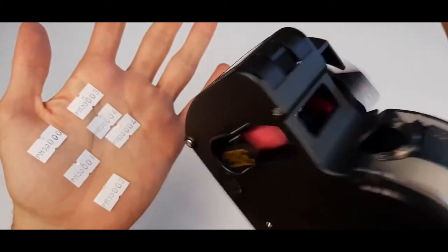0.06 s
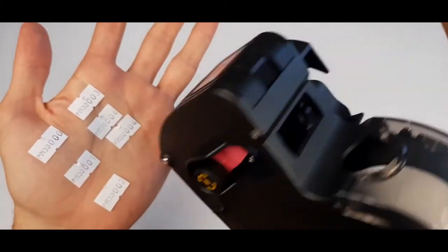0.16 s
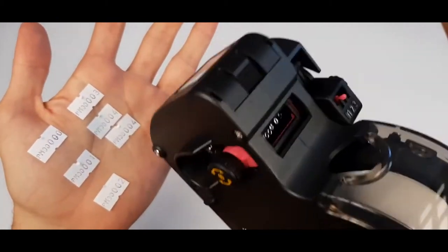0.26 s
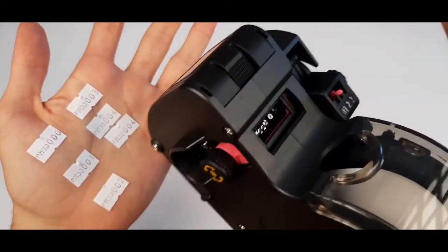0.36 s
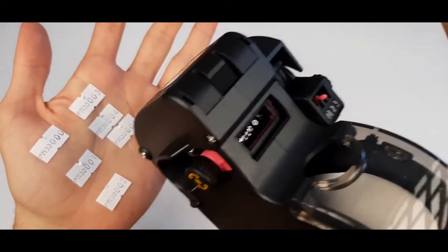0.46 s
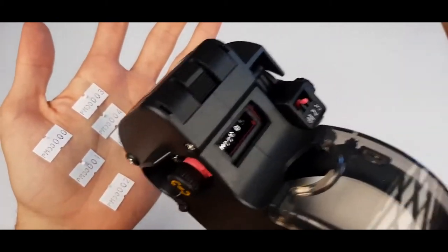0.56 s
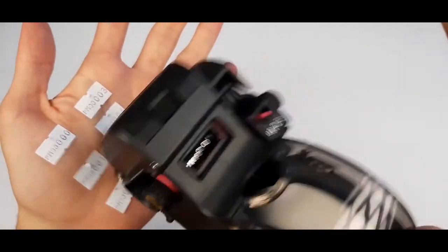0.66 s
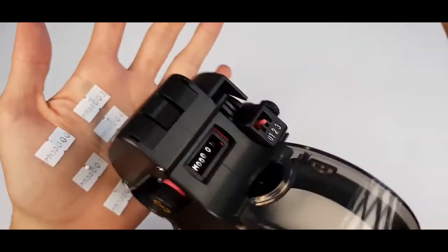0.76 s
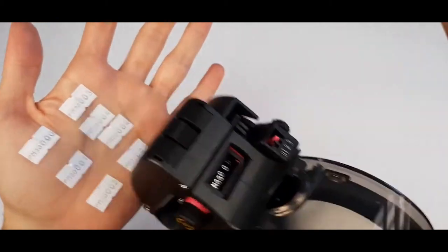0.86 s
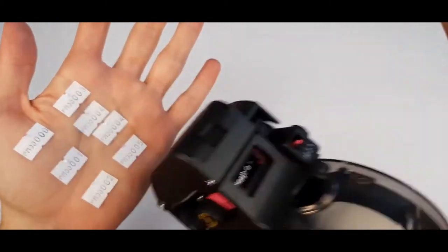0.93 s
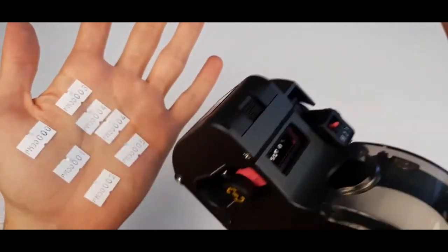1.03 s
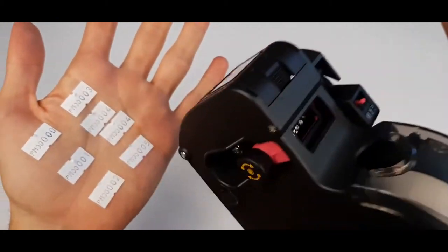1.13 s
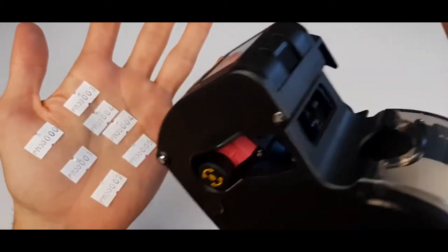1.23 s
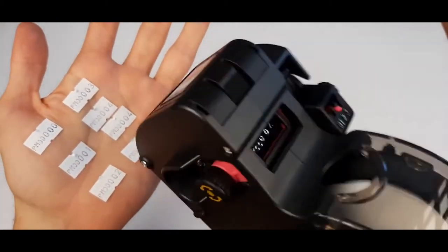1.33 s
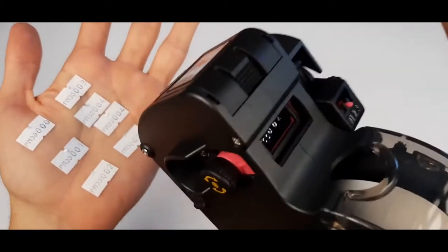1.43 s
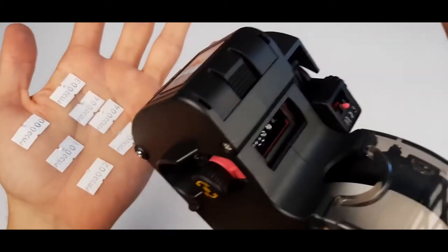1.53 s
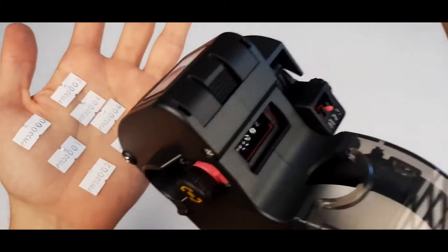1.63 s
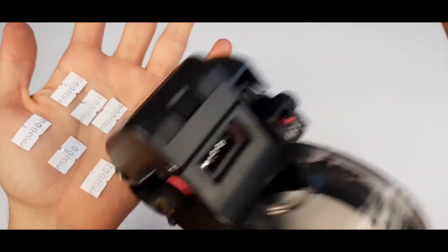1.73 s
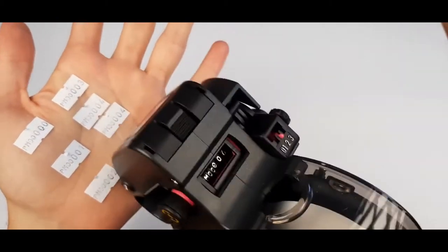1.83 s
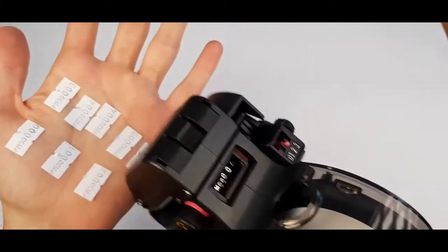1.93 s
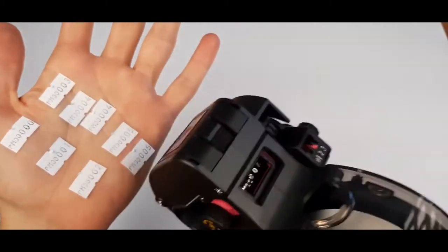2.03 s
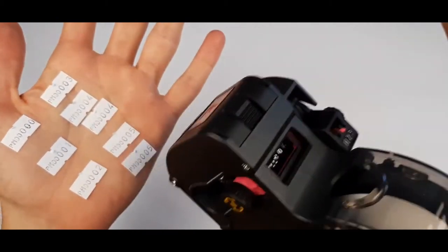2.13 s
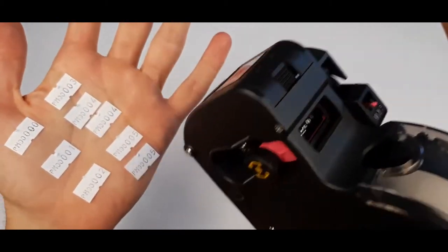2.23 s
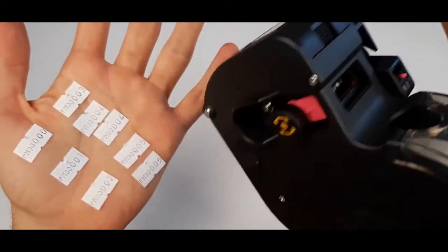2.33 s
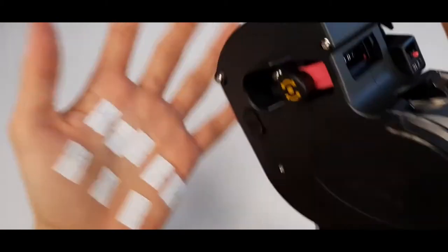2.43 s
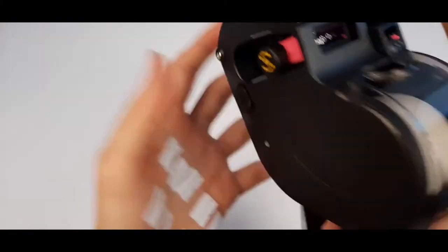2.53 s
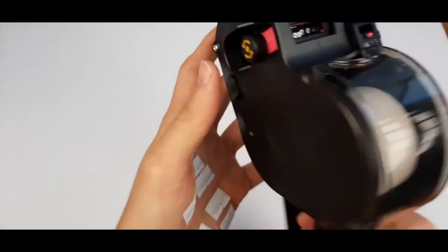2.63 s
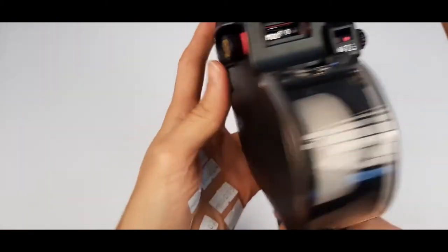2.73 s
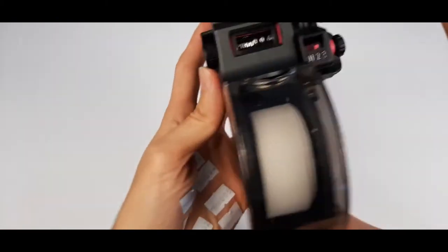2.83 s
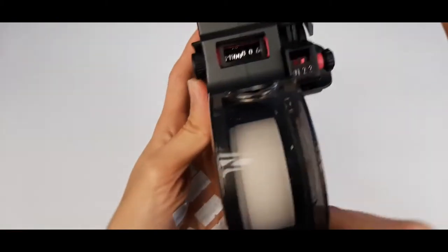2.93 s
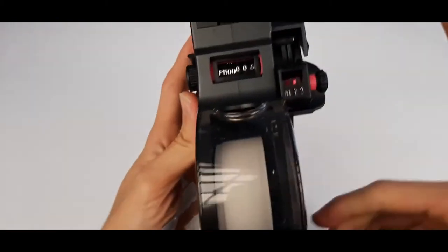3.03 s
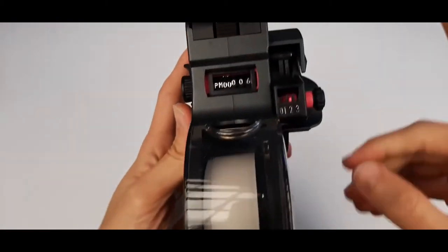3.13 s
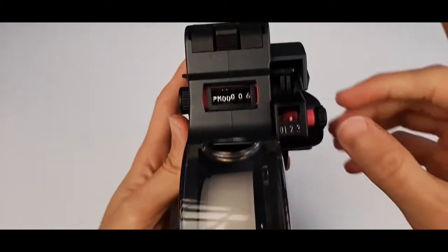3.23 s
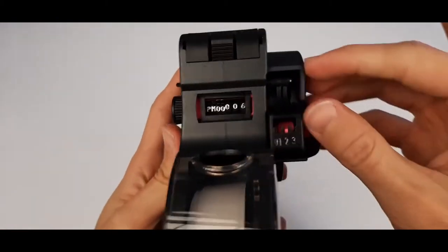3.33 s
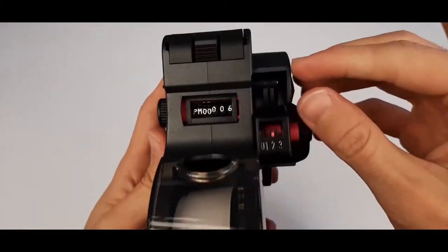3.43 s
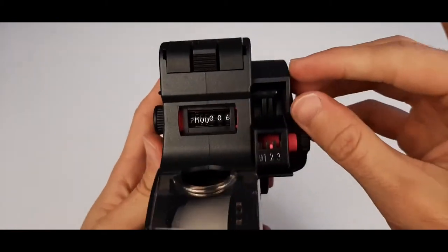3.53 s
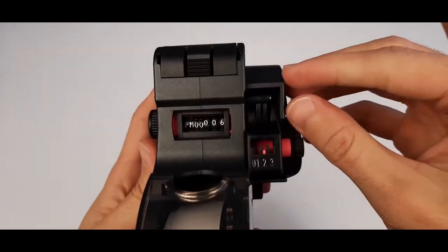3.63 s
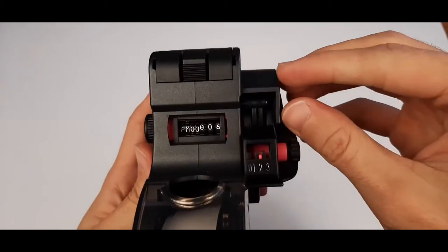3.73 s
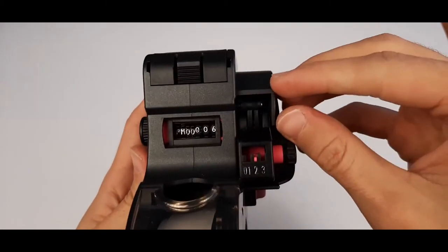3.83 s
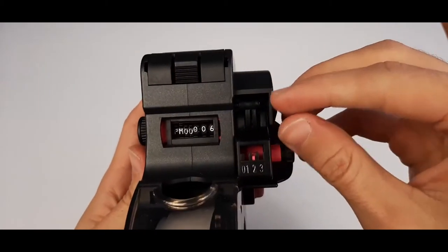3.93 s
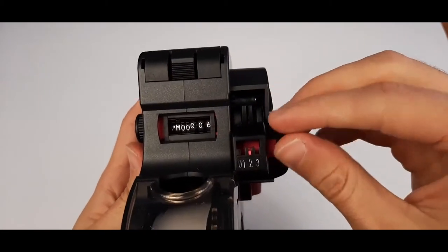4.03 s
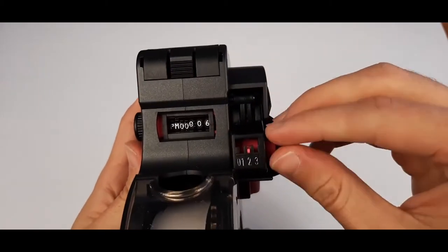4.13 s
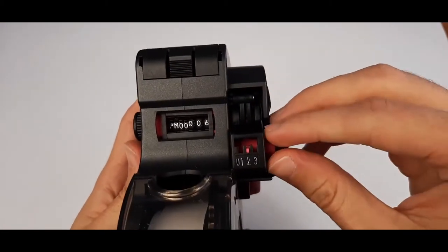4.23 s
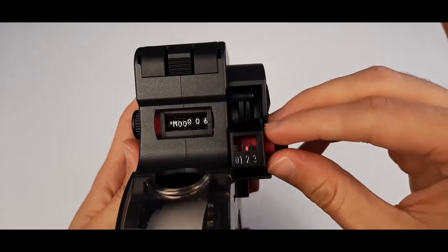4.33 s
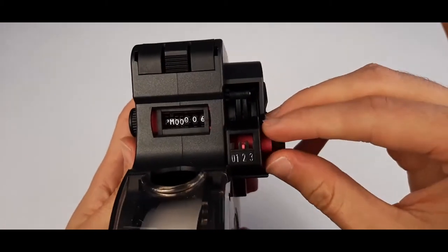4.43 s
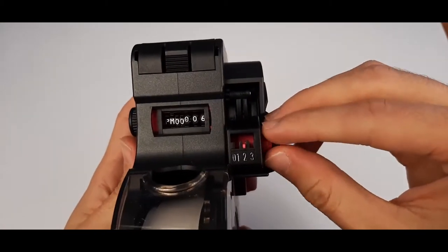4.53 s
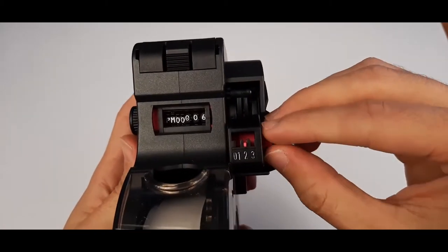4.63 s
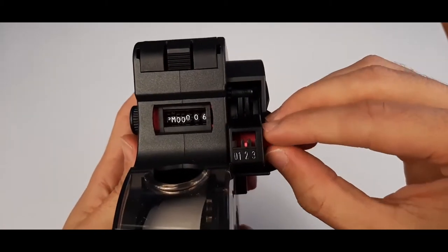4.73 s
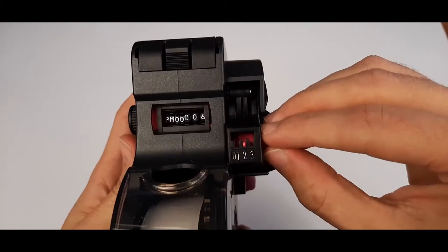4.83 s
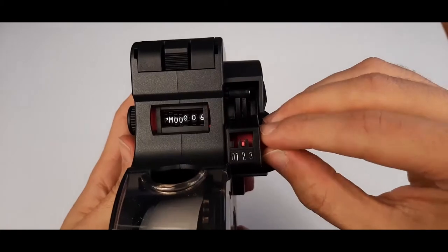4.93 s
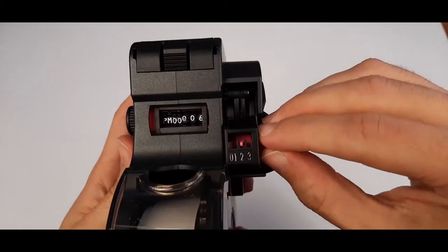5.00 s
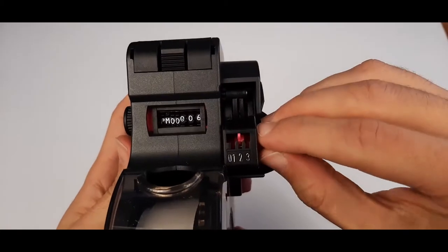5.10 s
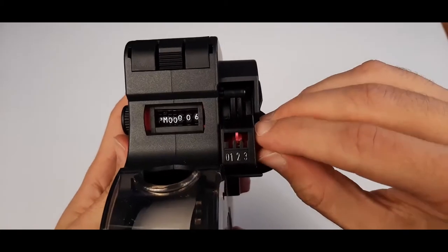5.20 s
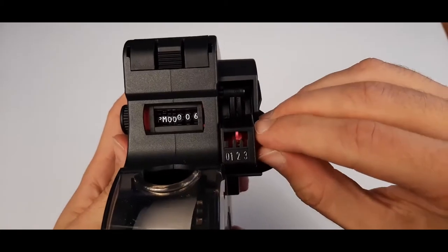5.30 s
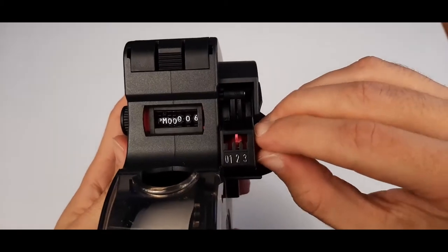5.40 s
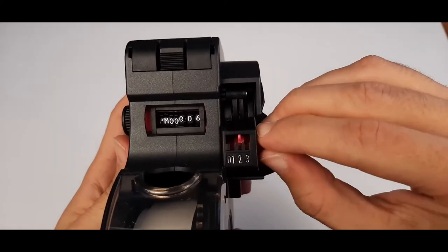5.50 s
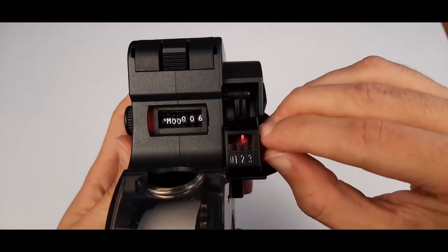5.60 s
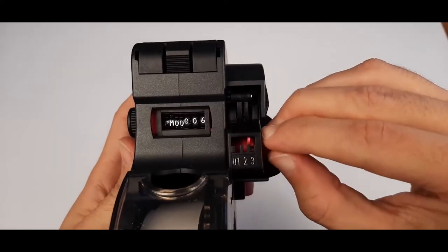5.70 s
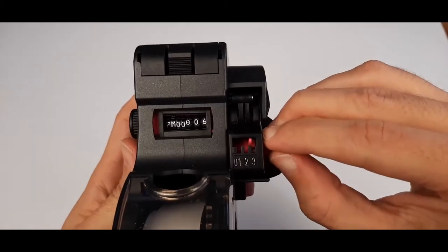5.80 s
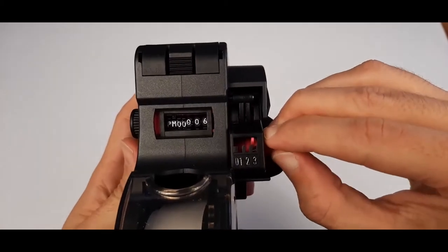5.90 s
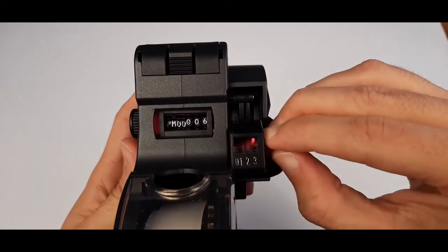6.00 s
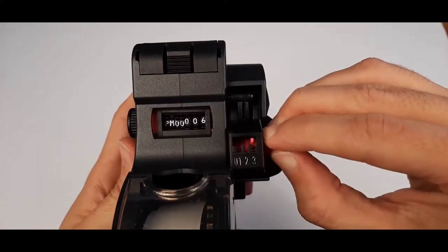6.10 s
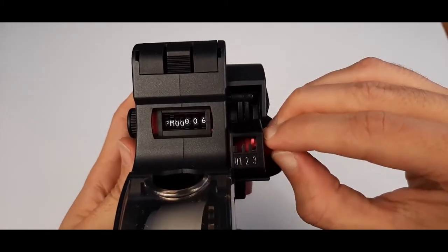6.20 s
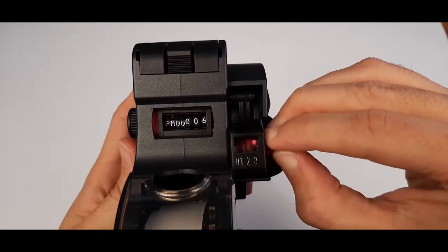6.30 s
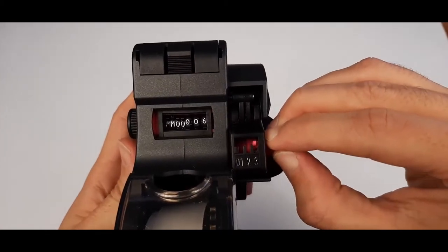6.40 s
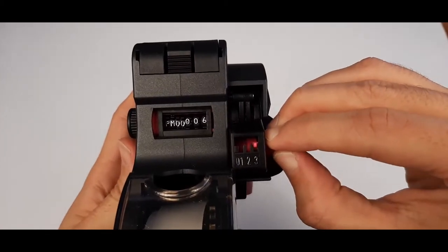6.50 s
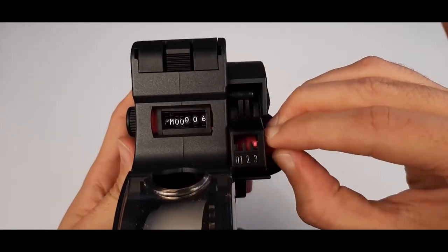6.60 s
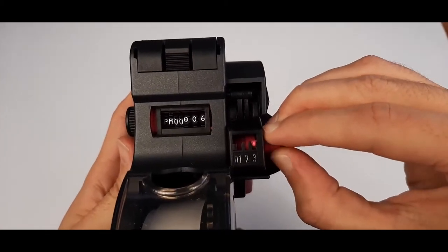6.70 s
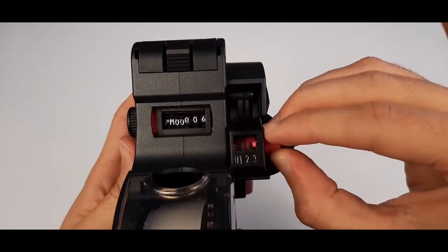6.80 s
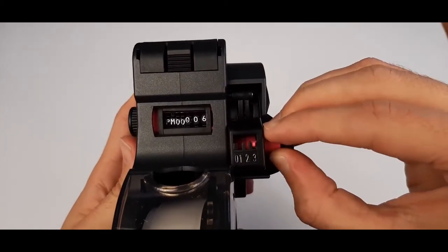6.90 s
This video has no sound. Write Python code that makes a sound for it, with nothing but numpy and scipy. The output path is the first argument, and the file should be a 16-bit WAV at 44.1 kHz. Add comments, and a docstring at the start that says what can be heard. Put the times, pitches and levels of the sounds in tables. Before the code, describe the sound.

A plastic hand-held labeling gun clacks twice in two loud squeeze-and-release cycles, then soft handling knocks and small knob clicks follow, close in a small room.

```python
"""Two hard plastic clacks each time a hand-held labeling gun is squeezed and released, close up in a small room.
Staged blows and scrapes excite a resonant shell; after each release two springs ring on as dying sines.
Labels are dabbed onto a palm; knocks and skin slides follow as the gun is turned over in the hands.
The print-setting knob is rubbed as filtered friction, then knocks into notches and plucks its detent spring.
Underneath lie faint creaks, a diffuse room tail, a thin hiss and a lumpy low rumble on the left."""
import sys
import numpy as np
from scipy import signal
from scipy.fft import rfft, irfft
from scipy.io import wavfile
from scipy.ndimage import uniform_filter1d

SR = 44100
rng = np.random.default_rng(int(sys.argv[2]) if len(sys.argv) > 2 else 0)


def transcribe(signal):
    """Save signal, clipped to [-1, 1], as a 16-bit WAV file at the path in sys.argv[1]."""
    frames = np.atleast_2d(signal).T
    limited = np.clip(frames, -1, 1)
    pcm = np.round(limited * 32767).astype(np.int16)
    wavfile.write(sys.argv[1], SR, pcm)


N = 306495  # length in samples

# The trigger hits its stop: (t/s, level/dB, stroke slowness as a factor)
SQUEEZES = [(0.1662, -4, 1.04), (1.2536, -2, .95)]
# The trigger snaps back: (t/s, level/dB, stroke slowness as a factor, long spring level/dB, short spring level/dB)
RETURNS = [(0.3089, -6, 1.1, -77, -47.5), (1.4045, -7, .9, -73, -54)]
# A squeeze takes up slack, trips the pawl, stamps and rebounds:
# (t from the stop/s at slowness 1, relative level/dB, rattle t60/s, low edge f/Hz, treble tilt/dB per octave)
SQUEEZE_STAGES = [(-.0235, -27, .05, 871.2, -4.5), (-.0087, -9, 0.048, 870, 1.5),
                  (0, 0.5, 0.019, 696.5, -0.5), (.0025, -7.5, .04, 658.5, -1.5)]
# A return lets go, drops the pawl, catches the strip and hits the rest: (same columns and units)
RETURN_STAGES = [(-.033, -19.5, .06, 951, -9.5), (-.0115, -10.5, .05, 873.4, -1.5),
                 (-.003, -4.5, .028, 855, 1), (0, 0.5, 0.021, 857.6, 0.87)]
# Long spring modes: (f/Hz, relative level/dB, t60/s)
LONG_SPRING = [(563.5, -0.5, 3), (606, 0.5, 4)]
# Short spring modes: (f/Hz, relative level/dB, t60/s)
SHORT_SPRING = [(982, -1, 0.89), (1057, -7, 0.85), (1953.6, -16.5, 1), (4046, -20.5, 0.7)]
FEED_S, FEED_DB = 0.028, -30  # the strip is pulled through just before the stamp
HOLD_DB, HOLD_GRAIN_DB = -35, 3.5  # the loaded lever scrapes between stamp and return
RECOIL_S, RECOIL_DB = 0.042, -21  # the lever slides back just before its rest
SPRING_WAVER_DB, SPRING_WAVER_S = 2.5, 0.06  # the springs chatter on their hooks


def trigger():
    """Each cycle feeds the strip, stamps, scrapes while held and snaps back; the springs ring on."""
    out = np.zeros((2, N))
    for squeeze, release in zip(SQUEEZES, RETURNS):
        stamp_s, stamp_db, stamp_slowness = squeeze
        rest_s, rest_db, rest_slowness, long_db, short_db = release
        out += clack(SQUEEZE_STAGES, stamp_s, stamp_db, stamp_slowness)
        out += clack(RETURN_STAGES, rest_s, rest_db, rest_slowness)

        feed = scrape(FEED_S, stamp_db + FEED_DB, tilt_db=-4.0)
        hold = scrape(rest_s - stamp_s, stamp_db + HOLD_DB, tilt_db=-2.0, grain_db=HOLD_GRAIN_DB)
        recoil = scrape(RECOIL_S, rest_db + RECOIL_DB, tilt_db=-0.53)
        add(out, stamp_s - FEED_S, feed)
        add(out, stamp_s, hold)
        add(out, rest_s - RECOIL_S, recoil)

        springs = amp(long_db) * ring(LONG_SPRING, length=2)
        springs += amp(short_db) * ring(SHORT_SPRING, length=2)
        add(out, rest_s, springs * waver(2 * SR, SPRING_WAVER_DB, SPRING_WAVER_S))
    return out


def clack(stages, stop_s, db, slowness):
    """The mechanism strikes its parts in a fixed order; a slower stroke spreads the blows out."""
    out = np.zeros((2, N))
    for offset_s, stage_db, t60, edge_hz, tilt_db in stages:
        struck = shell(blow(t60, rise_s=0.00078), edge_hz, tilt_db, push_db=4)
        add(out, stop_s + slowness * offset_s, amp(db + stage_db) * struck)
    return out


# A label is dabbed onto the palm: (t/s, level/dB, peel level/dB, peel treble tilt/dB per octave)
DABS = [(0.749, -32.5, -51, -6.5), (1.8292, -33.5, -62, -1.5)]
ROLL_S, ROLL_DB = 0.09, -25.5  # the nose rolls over the skin, level relative to the dab
PEEL_AFTER_S, PEEL_S = 0.188, 0.087  # from dab to middle of the peel, and the peel's length


def dabs():
    """The nose touches the palm, rolls over it and lets the label peel off its backing."""
    out = np.zeros((2, N))
    for s, db, peel_db, peel_tilt_db in DABS:
        add(out, s, tick(db, edge_hz=540, tilt_db=6))
        add(out, s, scrape(ROLL_S, db + ROLL_DB, tilt_db=-1.5))
        add(out, s + PEEL_AFTER_S - PEEL_S / 2, scrape(PEEL_S, peel_db, peel_tilt_db))
    return out


# Loose parts and fingers knock on the shell: (t/s, level/dB, low edge f/Hz, treble tilt/dB per octave)
TICKS = [(0.7532, -26.5, 2180, -1.5), (0.809, -37, 1800, 2.5), (0.8308, -35, 1060, -1),
         (0.847, -35.5, 850, 3), (0.9328, -35.5, 1020, -11), (0.96, -37, 1814, -1),
         (0.9716, -42.5, 2540, -2), (1.8894, -40, 1980, -5), (1.934, -44.5, 880, -1.5),
         (2.034, -51, 1200, -2.5), (2.581, -43, 864, -5.5), (2.6225, -31, 2280, -3.5),
         (2.7243, -46.5, 990, -10), (2.838, -49.5, 1193, 3), (2.991, -37, 920, -12), (3.358, -52, 1102, -5),
         (3.4107, -40, 952, -12), (3.541, -42, 870, -18.5), (4.284, -49.5, 886.5, -8),
         (4.579, -53, 990, -16), (4.9378, -52, 1435, -16), (5.613, -47, 1460, -21.5),
         (5.642, -47, 890, -16.5), (5.9521, -44.5, 903, 3.5), (6.252, -52, 1400, -15.5),
         (6.545, -45.5, 1400, -17), (6.5841, -41, 861, -11)]


def ticks():
    """Light contacts set the shell ringing in single knocks as the gun is moved about."""
    out = np.zeros((2, N))
    for s, db, edge_hz, tilt_db in TICKS:
        add(out, s, tick(db, edge_hz, tilt_db))
    return out


# The hands shift their grip: (middle t/s, length t/s, level/dB, treble tilt/dB per octave)
SLIDES = [(2.491, 0.091, -65.5, -24), (2.845, 0.34, -65, -2.5), (2.989, 0.084, -54, -6.5),
          (3.382, 0.068, -54.5, -8)]


def slides():
    """Skin slides over the shell as the grip changes, a grainy friction."""
    out = np.zeros((2, N))
    for s, length, db, tilt_db in SLIDES:
        add(out, s - length / 2, scrape(length, db, tilt_db, grain_db=2.0))
    return out


# Fingertips rub the knob: (middle t/s, length t/s, level/dB)
RUBS = [(3.629, 0.13, -74), (3.918, 0.09, -72.5), (4.119, .26, -77)]
# Resonances of the rubbed knob: (f/Hz, width f/Hz, relative level/dB)
KNOB_BODY = [(1990, 266, 10.5), (3020, 160, -4.5), (6970, 760, -9.5), (12220, 2100, -18.5)]
# The knob snaps into a notch: (t/s, ring level/dB, click level/dB)
KNOCKS = [(5.1633, -30.5, -32), (5.18, -35, -30)]
# Modes of the knob in its notch: (f/Hz, relative level/dB, t60/s)
NOTCH_MODES = [(972, 0.5, 0.049), (1076, -5.5, 0.033), (1770, -13.5, 0.093), (2470, -19, 0.12),
               (3330, -23, 0.1), (4660, -12, 0.056)]
# The turning knob plucks the detent spring: (t/s, level/dB)
PLUCKS = [(5.732, -53.5), (5.824, -52.5)]
# Modes of the detent spring: (f/Hz, relative level/dB, t60/s)
DETENT_MODES = [(1070, -6, 0.17), (1450, -13.5, 0.33), (2030, -6, 0.2), (2380, -6, 0.12), (3580, -21, 0.34),
                (4540, -10.5, 0.27), (4700, -11, 0.17), (5760, -10, 0.16), (6100, -9, .12),
                (7000, -3, 0.18), (7600, -5, 0.2), (7400, -9, 0.086)]
TURN_S, TURN_DB = 0.014, -17.5  # the knob rides its ramp around each snap, level relative to the click


def knob(chatter_db=6.5, pluck_click_db=-0.5):
    """Fingers rub the setting knob; it knocks into its notches and twangs its detent spring."""
    out = np.zeros((2, N))
    for s, length, db in RUBS:
        drive = friction(length, grain_db=4.5)
        rub = np.zeros_like(drive)
        for hz, width, mode_db in KNOB_BODY:
            b, a = signal.iirpeak(hz, hz / width, SR)
            rub += amp(mode_db) * signal.lfilter(b, a, drive)
        add(out, s - length / 2, amp(db) * evened(rub))
    for s, ring_db, click_db in KNOCKS:
        add(out, s - TURN_S / 2, scrape(TURN_S, click_db + TURN_DB, tilt_db=-1))
        add(out, s, amp(ring_db) * ring(NOTCH_MODES, length=0.3))
        add(out, s, tick(click_db, edge_hz=890, tilt_db=-1.5, t60=0.031))
    for s, db in PLUCKS:
        # the loose spring chatters against its seat, which roughens the ring
        chatter = waver(SR, chatter_db, period_s=0.0027)
        add(out, s, amp(db) * chatter * ring(DETENT_MODES, length=1))
        add(out, s, tick(db + pluck_click_db, edge_hz=1400, tilt_db=0.6))
    return out


def handling(per_s=40, spread_db=7.0, db=-63):
    """From 2.4 s on, the held shell gives off faint creaks: impulses at random moments and sizes."""
    busy = np.arange(N) > 2.4 * SR
    sizes = amp(spread_db * np.minimum(rng.exponential(1, N), 3))
    signs = rng.choice([-1, 1], N)
    struck = rng.random(N) < per_s / SR
    creaks = sizes * signs * busy * struck
    return amp(db) * shell(np.array([creaks, creaks]), edge_hz=780, tilt_db=-24.0, push_db=-6)[:, :N]


def tick(db, edge_hz, tilt_db, t60=0.03, softening_db=1.13):
    """A light contact rings the shell with little bass; the duller the touch, the slower it builds."""
    contact = blow(t60, rise_s=0.00079 * amp(-softening_db * tilt_db))
    return amp(db) * shell(contact, edge_hz, tilt_db, push_db=-6.5)


def scrape(length, db, tilt_db, grain_db=3.5):
    """One sliding stroke, heard through the shell."""
    return amp(db) * shell(friction(length, grain_db), edge_hz=860, tilt_db=tilt_db, push_db=-0.5)


# Colour of a blow on the shell: (f/Hz, relative level/dB)
SHELL_COLOUR = [(700, 0), (1100, -1.5), (1600, -3), (2300, -2), (3200, -6), (3800, -5.5), (5200, -4),
                (7000, -6.5), (8500, -12.5), (10500, -13), (13000, -12), (16000, -19)]
# Hollow plastic resonances: (f/Hz, width f/Hz, boost level/dB)
CAVITIES = [(746, 72, 3), (926, 46, 5), (1055, 110, 4.5), (1347.6, 39, 7), (1602, 140, 3.5),
            (1921.3, 82, 7.5), (2175, 81, 2.5), (2360, 270, 2), (2700, 61, 2), (2980, 90, 4.5),
            (3242, 100, 7), (4165, 51, 6), (5500, 140, 0.5)]
# Push of the whole body, heard below the low edge: (f/Hz, relative level/dB)
PUSH = [(30, -40), (90, -19), (180, -21.5), (260, -11), (360, -15), (460, -17.5), (700, -21), (1500, -45.5)]


def shell(drive, edge_hz, tilt_db, push_db, size=4096):
    """The plastic shell's causal response; small parts have a high low edge, soft touches little treble."""
    hz = abs(np.fft.fftfreq(size, 1 / SR))
    peaks_db = sum(db / (1 + (2 * (hz - f) / width) ** 2) for f, width, db in CAVITIES)
    radiated = 1 / np.sqrt(1 + (edge_hz / (hz + 1)) ** 20)
    pushed = amp(read(PUSH, hz) + push_db)
    octaves_up = np.log2(1 + (hz / 2300) ** 4) / 4  # bends in softly around 2300 Hz
    colour = amp(read(SHELL_COLOUR, hz) + peaks_db + tilt_db * octaves_up)
    gain = evened((radiated + pushed) * colour)
    # minimum phase: the phase follows from the log gain, so the hit starts at once
    response = np.fft.ifft(np.exp(np.conj(signal.hilbert(np.log(gain))))).real
    return signal.fftconvolve(drive, response[None, :size // 2], axes=1)


def blow(t60, rise_s, size=4096, count=4):
    """One contact scatters into a fast-dying rattle of tiny impacts that drives all frequencies evenly."""
    t = np.arange(size) / SR
    shape = (1 - np.exp(-t / rise_s)) * amp(-60 * t / t60)
    burst = noise_pair(size, alike_hz=2650) * shape
    for _ in range(count):
        # flatten the spectrum, then restore the envelope
        white = irfft(np.exp(1j * np.angle(rfft(burst))), size)
        power = abs(uniform_filter1d(white ** 2, size=80))
        burst = white * shape / np.sqrt(power + 1e-14)
    return burst


def friction(length, grain_db):
    """Grainy noise that swells and fades with one stroke."""
    size = int(length * SR)
    grains = amp(grain_db * evened(uniform_filter1d(rng.standard_normal(SR), size=60)))
    rough = noise_pair(SR, alike_hz=2000) * grains
    return evened(rough[:, :size]) * np.hanning(size)


def ring(modes, length, contact_s=0.0011):
    """Dying sines that build up during the contact, with their own phase in each channel."""
    t = np.arange(int(length * SR)) / SR
    sines = np.zeros((2, len(t)))
    for hz, db, t60 in modes:
        phase = rng.random() + rng.random((2, 1)) / 5  # in cycles
        sines += amp(db - 60 * t / t60) * np.sin(2 * np.pi * (hz * t + phase))
    return sines * (1 - np.exp(-(t / contact_s) ** 2))


def waver(size, db, period_s):
    """A gain that wanders at random about 1."""
    wander = uniform_filter1d(rng.standard_normal(size), size=max(int(period_s * SR), 1))
    return evened(amp(db * evened(wander)))


def noise_pair(size, alike_hz):
    """White noise in two channels: alike below alike_hz, growing unrelated above."""
    a, b = rfft(rng.standard_normal((2, size)))
    same = 0.95 / (1 + (np.fft.rfftfreq(size, 1 / SR) / alike_hz) ** 2)
    return irfft(np.array([a, same * a + np.sqrt(1 - same ** 2) * b]), size)


def amp(db):
    """Decibels to gain."""
    return 10 ** (np.asarray(db) / 20)


def evened(x):
    """Scales to rms 1."""
    return x / np.sqrt(np.mean(x ** 2) + 1e-20)


def read(points, hz):
    """Reads a curve on a log-frequency axis."""
    f, value = np.transpose(points)
    return np.interp(np.log(hz + 1), np.log(f + 1), value)


def add(mix, s, sound):
    """Mixes a stereo sound in at time s."""
    part = mix[:, max(round(s * SR), 0):][:, :sound.shape[1]]
    part += sound[:, :part.shape[1]]


def panned(db):
    """Gains of the two channels for a left-right difference."""
    return amp([[db / 2], [-db / 2]])


# Decay of the room: (f/Hz, t60/s)
ROOM_T60 = [(150, 0.25), (500, 0.47), (1000, 0.37), (2500, 0.3), (5000, 0.33), (8000, 0.32), (15000, 0.13)]
# Room tail against the direct sound, before panning: (f/Hz, level/dB)
ROOM_DB = [(100, -12), (400, -7.5), (1000, -10), (2500, -6.5), (5000, -9.5), (9000, -12.5), (15000, -9)]


def room(x, build_s=0.0056):
    """A diffuse tail that builds up quickly and dies band by band."""
    hz, t, z = signal.stft(noise_pair(SR, alike_hz=1710), SR, nperseg=256)
    t60 = read(ROOM_T60, hz)[:, None]
    decay = np.exp(-np.log(1000) * t / t60)
    unit_energy = np.sqrt(2 * np.log(1000) / (t60 * SR))
    build = 1 - np.exp(-(t / build_s) ** 2)
    z *= amp(read(ROOM_DB, hz))[:, None] * decay * unit_energy * build
    tail = signal.istft(z, SR, nperseg=256)[1]
    return signal.fftconvolve(x, tail, axes=1)[:, :N] * panned(db=2.24)


# Hiss colour: (f/Hz, relative level/dB per Hz)
HISS = [(20, -12.5), (55, -0.5), (130, 1.5), (300, -4.5), (500, -12.5), (1000, -15), (1900, -17.5),
        (2700, -27.5), (4500, -30.5), (6100, -32), (7000, -18.5), (8300, -37), (12500, -31), (16000, -34.5)]
# Hiss level before panning: (t/s, level/dB)
HISS_DB = [(0, -71), (1.1, -70.5), (2.3, -71.5), (3.199, -67.5), (6.95, -68)]
# Rumble colour: (f/Hz, relative level/dB per Hz)
RUMBLE = [(20, -19.5), (45, -3.5), (70, -1.5), (115, 4.5), (180, -6), (260, -10), (400, -23.5), (700, -31),
          (1500, -60)]
# Rumble level before lumps and panning: (t/s, level/dB)
RUMBLE_DB = [(2.3, -85.5), (2.57, -78), (4.25, -62), (4.71, -69.5), (4.81, -62), (5.07, -69.5),
             (5.86, -61.5), (6.95, -63.5)]


def background(lumps_db=1.0):
    """Quiet room tone with a thin hiss, and a lumpy low rumble that comes up on the left."""
    t = np.arange(N) / SR
    rates_hz = np.geomspace(3, 14, 12)
    lumps = evened(sum(np.sin(2 * np.pi * (rate * t + rng.random())) for rate in rates_hz))
    rumble = steady(RUMBLE, RUMBLE_DB, alike_hz=900) * amp(lumps_db * lumps) * panned(db=12.5)
    hiss = steady(HISS, HISS_DB, alike_hz=712.8) * panned(db=6.0)
    return hiss + rumble


def steady(spectrum, levels, alike_hz):
    """Coloured noise that follows a level curve."""
    colour = amp(read(spectrum, np.fft.rfftfreq(N, 1 / SR)))
    noise = irfft(rfft(noise_pair(N, alike_hz)) * colour, N)
    return evened(noise) * amp(np.interp(np.arange(N) / SR, *np.transpose(levels)))


# The gun's side as it is moved, positive to the left: (t/s, left-right level/dB)
PLACE = [(0.299, 3.5), (0.803, 6.5), (1.302, 3), (2.598, 6), (4, 6.5), (6.901, 8)]


def scene():
    """The gun, held a little to the left, its room and the background."""
    gun = trigger() + dabs() + ticks() + slides() + knob() + handling()
    side_db = np.interp(np.arange(N) / SR, *np.transpose(PLACE))
    left = gun[0] * amp(side_db / 2)
    right = np.roll(gun[1], 3) * amp(-side_db / 2)  # arrives 3 samples later
    return np.array([left, right]) + room(gun) + background()


def record(dry):
    """Soft overload on the highest peaks, then the band limit."""
    low_pass = signal.firwin(511, 16200, window=("kaiser", 9), fs=SR)  # edge in Hz
    return signal.oaconvolve(np.tanh(dry), low_pass[None], "same")


dry = scene()
out = record(dry)
transcribe(out)
```